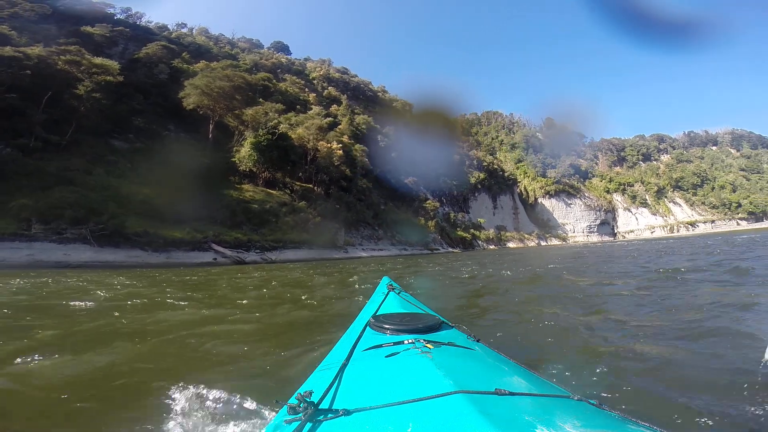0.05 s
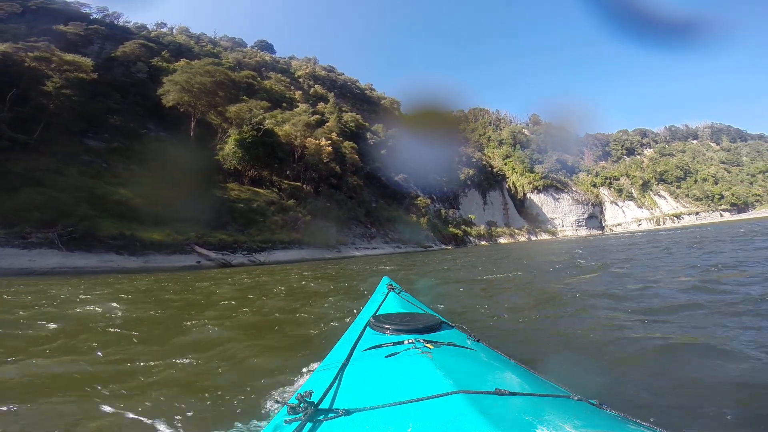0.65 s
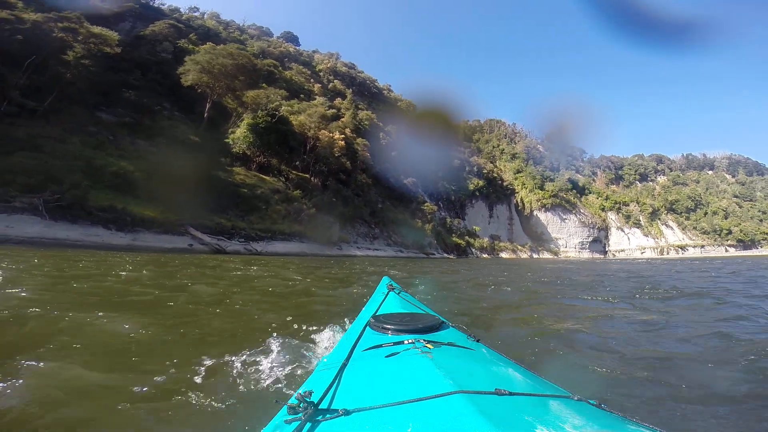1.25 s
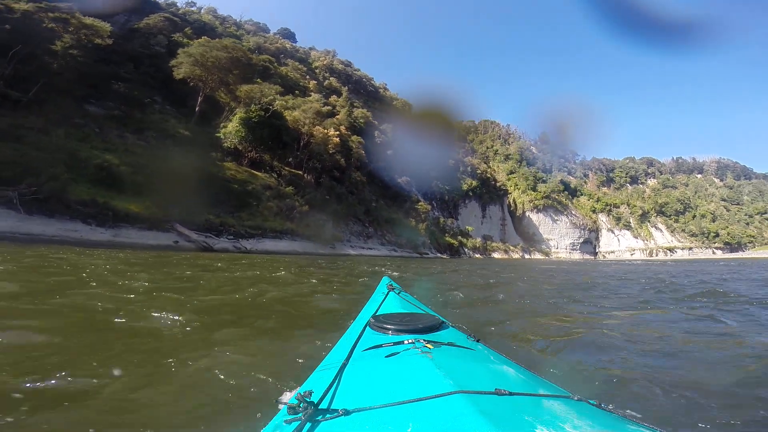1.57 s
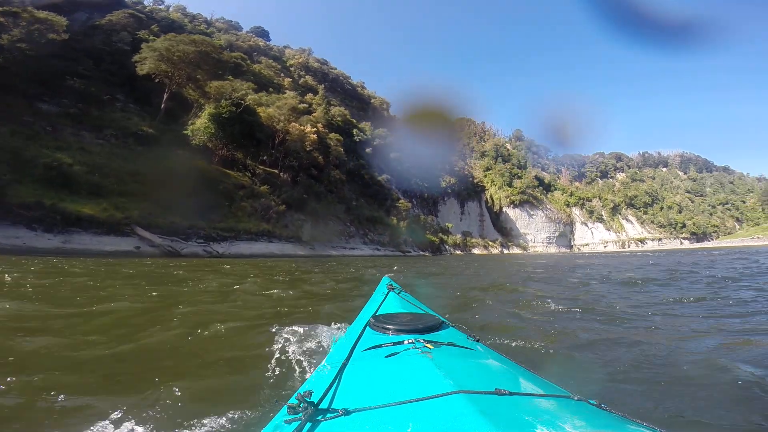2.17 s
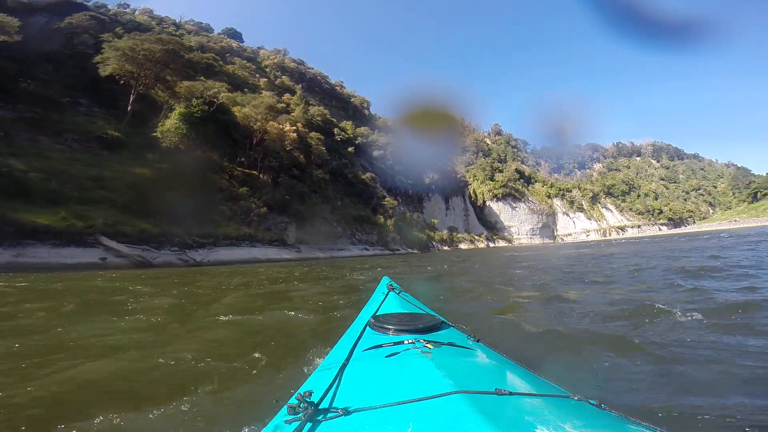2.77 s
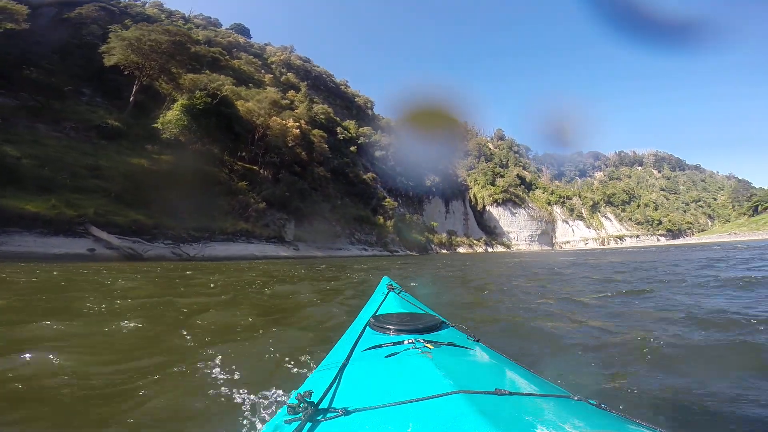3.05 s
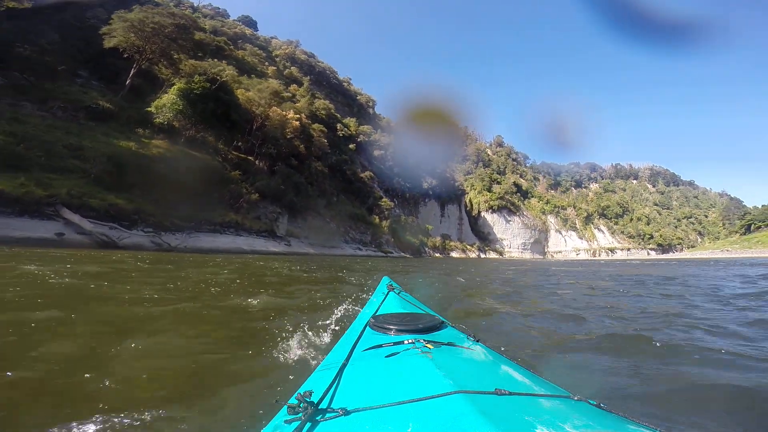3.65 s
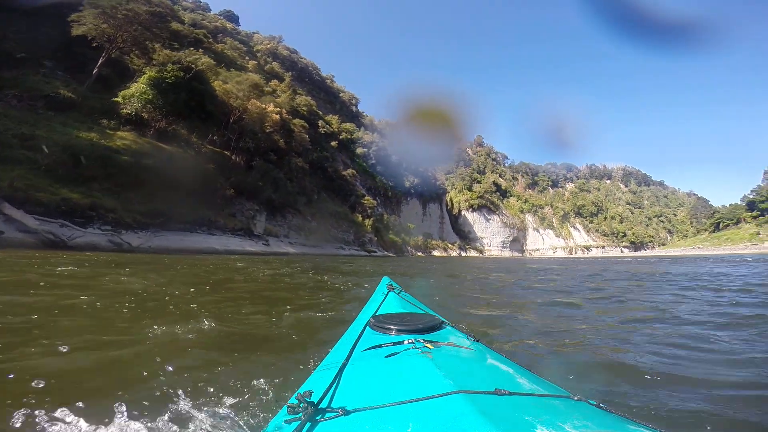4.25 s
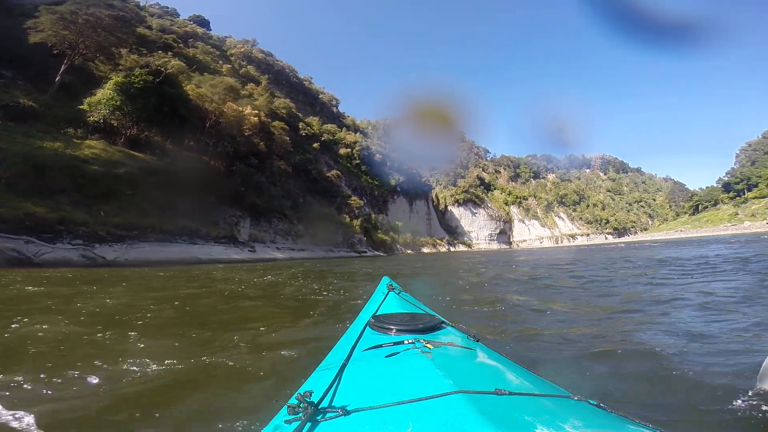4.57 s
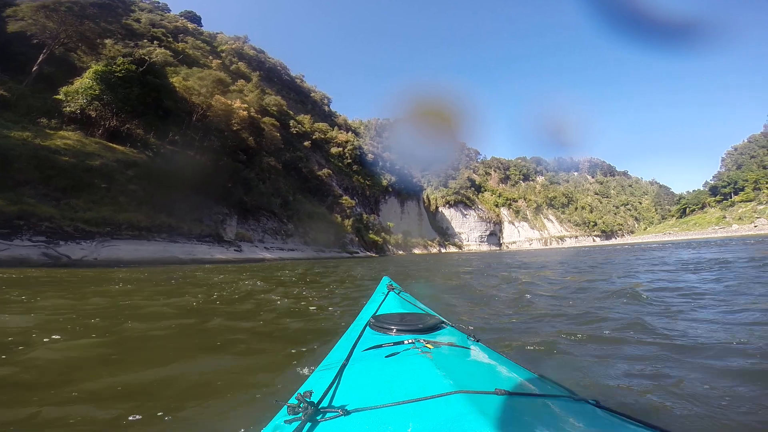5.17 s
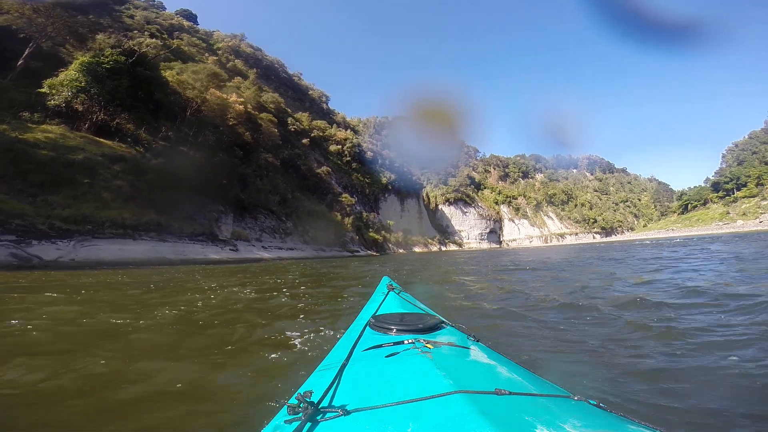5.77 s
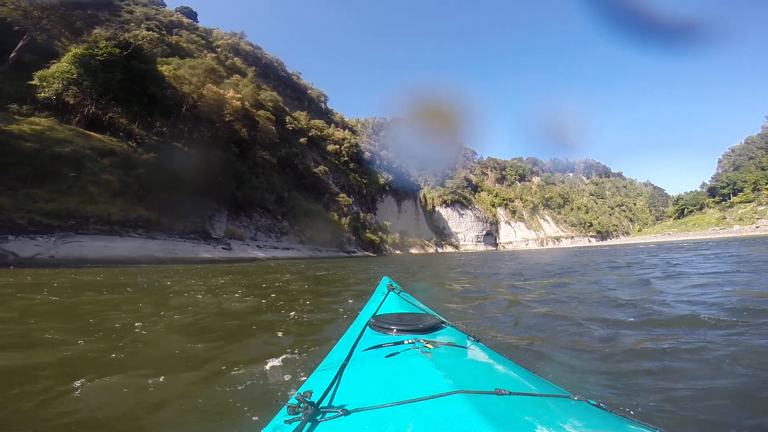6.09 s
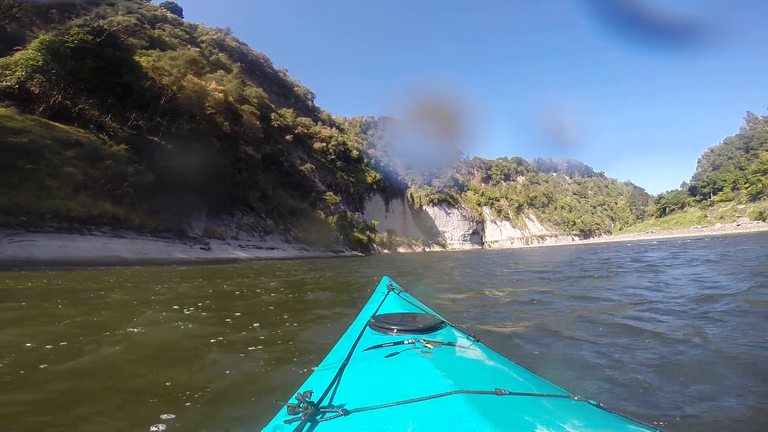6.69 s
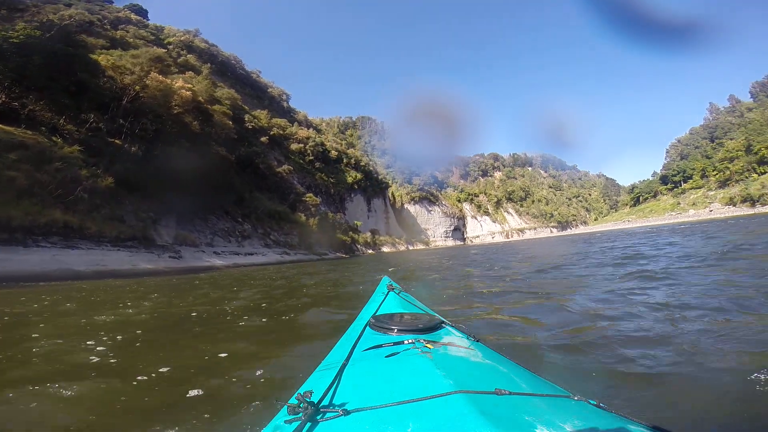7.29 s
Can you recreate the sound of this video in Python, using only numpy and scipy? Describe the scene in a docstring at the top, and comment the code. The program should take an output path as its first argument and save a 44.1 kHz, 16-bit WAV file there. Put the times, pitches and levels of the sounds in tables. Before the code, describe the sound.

A plastic kayak moves through choppy river water, heard up close from a microphone on its deck. Small waves gurgle and slap at the bow in quick, uneven bursts, with wet plops, fine spray and a few drops ticking on the deck. Trapped air gulps and makes the hollow hull thump. The water eases briefly, comes back stronger, then calms near the end, over a soft rumble and hiss.

```python
"""A plastic kayak moves through choppy river water, heard from a camera on its deck.
From the start, waves gurgle through the shell, shake the hull and spray, over a soft rumble and hiss.
Bubbles soon plop and drops tick on the deck. Then air trapped under the bow gulps, and the hull booms.
After a lull at about two seconds the waves pick up again; from about six seconds the water is calmer."""
import sys
import numpy as np
from scipy import signal
from scipy.fft import rfft, irfft, next_fast_len
from scipy.io import wavfile
from scipy.ndimage import map_coordinates

SR = 44100
rng = np.random.default_rng(int(sys.argv[2]) if len(sys.argv) > 2 else 0)


def generate_wav(sig):
    """Save sig (samples, or channels by samples) to the path in sys.argv[1] as 16-bit PCM at SR."""
    pcm = np.round(np.clip(np.atleast_2d(sig).T, -1, 1) * 32767).astype(np.int16)
    wavfile.write(sys.argv[1], SR, pcm)


N = 332073


def amp(db):
    """Turn decibels into a number to multiply by."""
    return 10 ** (np.asarray(db) / 20)


def unit(x):
    """Scale a sound to an average (rms) level of 1."""
    return x / np.sqrt(np.mean(x ** 2) + 1e-20)


def tone_gain(tone, hz):
    """How strongly a tone table of (Hz, dB) rows lets each frequency through."""
    points_hz, db = np.transpose(tone)
    return amp(np.interp(np.log(hz + 1), np.log(points_hz), db))


def curve(rows):
    """Join (seconds, value) points with straight lines."""
    return np.interp(np.arange(N) / SR, *np.transpose(rows))


def wobble(per_s):
    """A smooth curve through per_s random values a second."""
    return map_coordinates(rng.standard_normal(int(N * per_s / SR) + 4), [np.arange(N) * per_s / SR])


def filtered(x, response):
    """Turn each frequency up or down by response(hz)."""
    size = next_fast_len(len(x) + 8192)
    return irfft(rfft(x, size) * response(np.fft.rfftfreq(size, 1 / SR)), size)[:len(x)]


def through(x, tone, size=4096):
    """Pass a sound through a body that rings only after it is struck."""
    cepstrum = irfft(np.log(tone_gain(tone, np.fft.rfftfreq(size, 1 / SR))))
    cepstrum[1:size // 2] *= 2  # move all ringing to after the strike
    cepstrum[size // 2 + 1:] = 0
    ring = irfft(np.exp(rfft(cepstrum)))
    return signal.fftconvolve(x, ring)[:len(x)]


def noise(tone):
    """Steady noise with the given tone."""
    return unit(filtered(rng.standard_normal(N), lambda hz: tone_gain(tone, hz)))


def add(track, start_s, sound):
    """Mix a sound into the track."""
    part = track[max(0, round(start_s * SR)):][:len(sound)]
    part += sound[:len(part)]


def swell(t, life_s, rise):
    """Rise quickly to 1, then die away; rise is a share of the life."""
    shape = (1 - np.exp(-t / (rise * life_s))) * np.exp(-t / life_s)
    return shape / shape.max()


def surges(rows, rise_s, fall_s):
    """A level that builds, holds and fades for each (start, hold, dB) row."""
    t, power = np.arange(N) / SR, np.zeros(N)
    for start, hold, db in rows:
        near = slice(max(0, int((start - 10 * rise_s) * SR)), int((start + hold + 10 * fall_s) * SR))
        fade = np.maximum(start - t[near], 0) / rise_s + np.maximum(t[near] - start - hold, 0) / fall_s
        power[near] += (amp(db) * np.exp(-fade)) ** 2
    return np.sqrt(power)


def bubble(t, hz, life_s, glide):
    """Air rings in water; a positive glide lifts the pitch, as when a bubble nears the surface."""
    pitch = hz * (1 + glide * (np.tanh(t / (2 * life_s)) - .5))
    return np.sin(2 * np.pi * np.cumsum(pitch) / SR)


def burst(t, hz, life_s, splashy, rise, glide, octaves, tone):
    """One ringing bubble mixed with splashing noise around its pitch."""
    shape = swell(t, life_s, rise)
    band = lambda f: tone_gain(tone, f) * np.exp(-.5 * (np.log2((f + 1) / hz) / octaves) ** 2)
    splash = shape * filtered(rng.standard_normal(len(t)), band)
    ring = shape * bubble(t, hz, life_s, glide)
    return unit(np.sqrt(1 - splashy) * unit(ring) + np.sqrt(splashy) * unit(splash)) * np.std(ring)


def swarm(tone, per_s, centre_hz, octaves, cycles, spread_db, size):
    """A steady crowd of tiny bubbles or drops of random pitch and strength, heard through a body."""
    draws = rng.random((int(per_s * N / SR), 4))
    start = (draws[:, :1] * N).astype(int)
    hz = centre_hz * 2 ** (octaves * (draws[:, 1:2] + draws[:, 2:3] - 1))
    strength = amp(spread_db * np.minimum(-np.log(1 - draws[:, 3:]), 4))
    turns = hz * np.arange(size) / SR
    climb = 1 + .012 * turns / cycles
    rings = strength * np.exp(-turns / cycles) * np.sin(2 * np.pi * turns * climb)
    crowd = np.bincount((start + np.arange(size)).ravel(), rings.ravel(), N)[:N]
    return unit(through(crowd, tone))


# The tones of the rumble, river and hiss. Each row: frequency in Hz, boost or cut in dB.
RUMBLE_TONE = [(10, -22), (25, 3), (31, -2), (42, 2.5), (60, -2.5), (90, -3.5), (200, -55)]
RIVER_TONE = [(40, -18), (65, -32), (130, 4), (240, -13), (750, -18.5), (1300, -17), (1600, -41),
              (2240, -16), (4000, -34), (6000, -61)]
HISS_TONE = [(3200, -23.5), (4400, -16), (5100, -7.5), (5700, 1), (6150, 2), (6750, -7.5), (7350, -4.5),
             (8100, -10.5), (10100, -16), (11800, -32), (12900, -27.5), (15100, -40)]
# How the rumble comes and goes. Each row: time in seconds, level in dB.
RUMBLE_LEVELS = [(0, -67), (.45, -48.5), (.8, -41), (.98, -52), (1.18, -40), (1.35, -49), (1.6, -51),
                 (2.0, -57), (2.22, -45.5), (2.75, -52.5), (3.43, -45), (3.68, -60), (3.92, -44),
                 (4.1, -54), (4.62, -54), (4.88, -47), (5.55, -51), (5.85, -62), (7.5, -56)]
def background():
    """A low rumble, the open river, and the camera's hiss with its faint whine."""
    whine = np.sin(2 * np.pi * np.cumsum(12455 + 10 * wobble(30)) / SR)
    rumble = amp(curve(RUMBLE_LEVELS)) * noise(RUMBLE_TONE)
    return rumble + amp(-55.5) * noise(RIVER_TONE) + amp(-49.5) * noise(HISS_TONE) + amp(-85) * whine


# Lapping between the waves. Each row: time in seconds, level in dB.
LAPPING = [(0, -52.5), (1.5, -54.5), (2.3, -56), (3.5, -53), (5.3, -57.5), (6, -58.5), (7.5, -60)]
# Waves at the bow. Each row: arrival and hold in seconds, then gurgle, push and spray levels in dB.
BOW_WAVES = [(.02, 0.17, -55.5, -48, -56.5), (0.197, 0.098, -42, -35, -44.5),
             (0.392, 0.017, -41.5, -34.5, -66), (0.626, 0.13, -46.5, -47, -49),
             (0.866, 0.17, -41, -38, -48.5), (1.096, 0.045, -39.5, -30, -46),
             (1.237, 0.11, -50.5, -50, -47.5), (1.374, 0.13, -43.5, -38.5, -45),
             (1.543, 0.05, -38.5, -32, -50.5), (1.682, .02, -41.5, -38.5, -65),
             (1.805, 0.13, -48, -42, -50.5), (2.058, .22, -56.5, -52, -58), (2.472, .14, -43.5, -38, -46.5),
             (2.68, 0.054, -58, -64, -53), (2.856, 0.066, -49.5, -42.5, -54),
             (2.94, 0.079, -40.5, -33.5, -52), (3.072, 0.041, -43.5, -30, -57),
             (3.28, 0.034, -42, -48, -49.5), (3.337, 0.047, -35.5, -36, -53),
             (3.471, 0.014, -45.5, -39.5, -54), (3.687, 0.1, -49.5, -40, -48), (3.833, 0.12, -37, -31, -60),
             (4.153, 0.19, -41, -39, -47), (4.498, 0.086, -38.5, -38, -52),
             (4.699, 0.094, -36.5, -30.5, -51), (4.949, 0.037, -33.5, -29.5, -44.5),
             (5.056, 0.11, -49.5, -44.5, -52.5), (5.293, 0.095, -42, -40, -52),
             (5.534, .03, -41, -32.5, -59), (5.622, 0.16, -53.5, -46.5, -71),
             (6.075, 0.029, -52, -44.5, -70), (6.372, 0.025, -58.5, -44, -73),
             (6.562, 0.18, -56, -50.5, -68), (6.802, .03, -50, -43, -71), (6.974, 0.076, -48.5, -46, -69),
             (7.122, 0.066, -56.5, -47.5, -67), (7.53, .04, -61, -53, -52)]
def wave_levels():
    """How hard the water gurgles, pushes the hull and sprays: each wave rides on the lapping."""
    start, hold, gurgle_db, push_db, spray_db = np.transpose(BOW_WAVES)
    lapping = amp(curve(LAPPING) + 2.9 * wobble(21))
    gurgle = surges(zip(start, hold, gurgle_db), rise_s=.031, fall_s=.042)
    push = surges(zip(start, hold, push_db), rise_s=.015, fall_s=.049)
    spray = surges(zip(start, hold, spray_db), rise_s=.066, fall_s=.029)
    return np.hypot(gurgle, lapping), np.hypot(push, amp(3.5) * lapping), np.hypot(spray, amp(-4.5) * lapping)


# The hull's own notes. Each row: pitch in Hz, width in Hz, strength in dB.
HULL_NOTES = [(86.6, 26.3, 0.5), (130.8, 27.3, -0.5), (168.2, 13, -4), (227.3, 28.4, -9.5),
              (293.1, 15.4, -7), (421, 50, -13)]
def hull(push):
    """The hollow hull answers a push by ringing at its low notes."""
    def response(f):
        return sum((-1) ** k * amp(db) * 1j * f * width / (hz * hz - f * f + 1j * f * width)
                   for k, (hz, width, db) in enumerate(HULL_NOTES))
    return filtered(push, response)


# The tones of the plastic shell and the spray. Each row: frequency in Hz, boost or cut in dB.
SHELL_TONE = [(200, -10), (450, 1.5), (740, -4), (960, -3), (1110, -5), (1320, 3), (1480, -7), (1670, 3.5),
              (1900, -4), (2220, 2.5), (2650, -4.5), (3000, -6.5), (4200, -9.5), (9000, -28)]
SPRAY_TONE = [(1200, -5.5), (2800, 4.5), (4000, 0.5), (5200, 1), (7000, -0.5), (10000, -14), (15000, -27)]
def wash(gurgle_level, push_level, spray_level):
    """Running water gurgles through the shell, shakes the hull and throws fine spray."""
    flutter = wobble(60)
    froth = swarm(SHELL_TONE, per_s=1500, centre_hz=1413, octaves=1.98, cycles=2.6, spread_db=1.5, size=512)
    blips = swarm(SHELL_TONE, per_s=230, centre_hz=1785, octaves=1.512, cycles=7.5, spread_db=4, size=1024)
    gurgle = unit(froth + amp(1) * blips)
    shake = unit(hull(rng.standard_normal(N)))
    spray = swarm(SPRAY_TONE, per_s=1800, centre_hz=4296, octaves=1.505, cycles=5.6, spread_db=3, size=128)
    return (gurgle_level * amp(3.1 * flutter) * gurgle
            + push_level * amp(.87 * flutter) * shake
            + spray_level * amp(1.7 * flutter) * spray)


def stray_plops(gurgle_level, per_s=8, centre_hz=2530, octaves=.554):
    """Rows for small plops at random moments, louder when the water gurgles harder."""
    rows = []
    for when, soft, pitch, splashy in rng.random((int(per_s * N / SR), 4)):
        db = 20 * np.log10(gurgle_level[int(when * N)]) + 7.5 - 2 * soft
        hz = centre_hz * 2 ** (octaves * (2 * pitch - 1))
        rows.append((when * N / SR, db, hz, splashy / 2))
    return rows


# The clearest bubbles and slaps.
# Each row: start in seconds, level in dB, pitch in Hz, splashiness from 0 to 1.
CLEAR_PLOPS = [(.189, -26.5, 1350, 0.45), (.228, -25, 1655, .1), (.309, -28.5, 1210, .1),
               (.387, -25, 1650, .5), (.423, -30, 2150, .03), (.44, -27, 2320, 0.3),
               (.589, -26.5, 1870, 0.5), (.7, -19.5, 2226, .03), (.722, -25.5, 1170, 0.8),
               (.888, -25, 1920, 0.37), (1.017, -27.5, 2180, 0.4), (1.113, -17.5, 1310, 0.45),
               (1.122, -25.5, 1040, 0.6), (1.238, -32.5, 1650, 0.1), (1.29, -28, 4000, 0.3),
               (1.405, -21.5, 1724, 0), (1.603, -25.5, 930, .1), (1.688, -25, 1720, 0),
               (1.795, -34.5, 2650, 0), (1.861, -25.5, 1760, 0), (1.901, -33, 2880, 0),
               (2.057, -32, 1350, .4), (2.195, -38, 1380, .1), (2.588, -15, 1197, 0.36),
               (2.689, -27, 2730, 0.8), (2.739, -31.5, 2830, .4), (2.941, -22.5, 1680, 0.2),
               (2.973, -26, 1650, 0.6), (2.992, -20, 1700, 0.9), (3.078, -24.5, 1320, 0.65),
               (3.256, -25.5, 2190, 0.3), (3.259, -21.5, 980, 0.4), (3.381, -23, 1270, 0),
               (3.466, -29.5, 1066, 0), (3.486, -24.5, 1217, 0.08), (3.561, -30, 2550, 0.2),
               (3.618, -28, 1275, 0.16), (3.683, -28.5, 976, .5), (3.702, -27.5, 697, 0),
               (3.766, -19, 1320, 0.05), (3.836, -22, 1290, .9), (3.869, -27, 1460, 0.2),
               (3.919, -24, 1644, 0), (3.935, -18, 1594, .6), (3.936, -25.5, 4800, 0.07),
               (4.135, -19.5, 1218, 0.15), (4.259, -24, 1710, 1), (4.314, -26, 1605, 0.15),
               (4.357, -32.5, 2490, 0.36), (4.425, -31.5, 4300, 0.35), (4.493, -25.5, 1260, 0.3),
               (4.559, -21.5, 694, 0.98), (4.645, -28.5, 2300, 0.6), (4.664, -21.5, 1680, 1),
               (4.702, -17.5, 928, 0), (4.737, -24, 1250, 1), (4.774, -24.5, 1350, .2),
               (4.807, -24, 1680, 0.05), (4.955, -21.5, 1760, .9), (4.972, -26, 1385, .05),
               (5.009, -27.5, 2020, 0), (5.043, -27.5, 935, 1), (5.117, -26.5, 854, 0.05),
               (5.298, -17, 1627, 0.14), (5.373, -33, 1350, 0), (5.518, -33, 866, 0.8),
               (5.555, -25, 990, 0.6), (5.728, -19, 2116, 0.14), (5.9, -38.5, 1750, 0.6),
               (6.089, -37, 1690, .7), (6.542, -30.5, 1630, 1), (6.631, -37.5, 2120, 0.2),
               (7.046, -30, 1710, 0), (7.423, -40, 2320, .15)]
def plops(strays):
    """Short wet pops: the water rustles, a bubble rings, and the shell rattles briefly."""
    pops, rattles, rustles = np.zeros((3, N))
    t = np.arange(SR // 12) / SR
    for start, db, hz, splashy in CLEAR_PLOPS + strays:
        # Bigger, lower bubbles ring longer, and so do cleaner ones.
        life_s = .0035 * (1600 / hz) ** .48 * (1 - .14 * (splashy - .5))
        pop = burst(t, hz, life_s, splashy, rise=.58, glide=.096, octaves=.93, tone=SHELL_TONE)
        rattle = burst(t, hz, life_s=.0064, splashy=.99, rise=.31, glide=0, octaves=.16, tone=SHELL_TONE)
        rustle = burst(t, hz, life_s=.0022, splashy=.55, rise=.26, glide=0, octaves=.51, tone=SHELL_TONE)
        add(pops, start - .0005, amp(db) * pop)
        add(rattles, start + .001974, amp(db) * rattle)
        add(rustles, start + .00188 - t[-1], amp(db) * rustle[::-1])  # backwards, to build into the pop
    return amp(-1.5) * pops + amp(-11.5) * rattles + amp(-12) * rustles


# The tone of the deck. Each row: frequency in Hz, boost or cut in dB.
DECK_TONE = [(2000, -9), (5000, 8), (8000, -2), (10500, -2.5), (14500, -12)]
# Showers thrown by two waves. Each row: start in seconds, hold in seconds, level in dB.
SHOWERS = [(.21, .06, -75), (1.32, 0.087, -53.5)]
# Single big drops. Each row: start in seconds, level in dB, pitch in Hz.
BIG_DROPS = [(.6524, -39, 10500), (1.598, -42, 11000), (1.7935, -47, 11500), (1.833, -47, 12500),
             (1.93, -43, 12500), (3.3444, -38, 9500), (4.52, -22, 7800), (6.272, -38, 11800)]
def drips(spray_level):
    """Water lands on the deck: small drops patter with the spray and showers, big ones tick."""
    patter = swarm(DECK_TONE, per_s=250, centre_hz=9600, octaves=.66, cycles=.75, spread_db=2.5, size=128)
    patter_level = amp(-14.5) * spray_level + surges(SHOWERS, rise_s=.025, fall_s=.035)
    ticks, t = np.zeros(N), np.arange(SR // 50) / SR
    for start, db, hz in BIG_DROPS:
        tick = burst(t, hz, life_s=.0016, splashy=.86, rise=.36, glide=0, octaves=.26, tone=DECK_TONE)
        add(ticks, start, amp(db - 8) * tick)
    return ticks + patter_level * patter


# The tone of a gulp's splash. Each row: frequency in Hz, boost or cut in dB.
POCKET_TONE = [(80, 3), (250, 0.5), (420, 2), (560, -3), (800, -7.5), (1200, -11)]
# Air caught under the bow.
# Each row: start in seconds, level in dB, pitch in Hz, boom level in dB, splashiness from 0 to 1.
AIR_POCKETS = [(.724, -21.5, 224, -16, 0.5), (0.754, -26, 183, -20, 0.06), (1.039, -24, 471, -23.5, 0.5),
               (1.118, -19.5, 271, -28, 0.9), (1.5471, -9.5, 264.5, -36, 0.09),
               (1.571, -18.5, 188, -34, 0.1), (2.456, -29.5, 222, -31, 0.74), (2.59, -25.5, 336, -33, 1),
               (2.615, -33.5, 310, -27, 0.3), (2.941, -21.5, 308, -28, 0.8),
               (2.967, -30.5, 395, -24.5, 0.4), (3.0, -30, 282, -22.5, .3), (3.081, -16.5, 282, -24, 0.12),
               (3.097, -17.5, 250, -33, 0.06), (3.26, -26.5, 220, -36, 0.7), (3.306, -28.5, 193, -22, 0.65),
               (3.409, -28, 270, -16, 0.4), (3.705, -23, 490, -28, 0.64), (3.765, -29, 400, -30, .55),
               (3.833, -15, 455, -23, 0.1), (3.848, -17.5, 199, -23, .6), (3.866, -18, 375, -28, 1),
               (4.134, -32, 398, -34, .7), (4.56, -22.5, 409, -25.5, .57), (4.72, -25, 283, -18.5, 1),
               (4.753, -38, 191, -18.5, 0.1), (4.781, -29, 300, -22, 0.8), (4.826, -37, 374, -18.5, .5),
               (5.113, -29.5, 410, -30, 0.5), (5.296, -26.5, 333, -36, 0.6),
               (5.549, -22.5, 191, -19.5, 0.94), (5.624, -34, 269, -34, 0.94),
               (5.902, -35.5, 323, -29.5, 0.77), (6.069, -42.5, 280, -31, 0.4),
               (6.546, -35.5, 257, -43, 0.4), (6.997, -40.5, 344, -39, 0.7), (7.218, -34, 389, -45, 0.42)]
def gulps():
    """A wave closes on a pocket of air; the pocket throbs and the hull booms after it."""
    out, t = np.zeros(N), np.arange(SR // 6) / SR
    for start, db, hz, boom_db, splashy in AIR_POCKETS:
        throb = burst(t, hz, life_s=.01, splashy=splashy, rise=.19, glide=-.062, octaves=1, tone=POCKET_TONE)
        boom_hz = 130 * 2 ** rng.normal(0, .14)
        boom = swell(t, life_s=.026, rise=.2) * bubble(t, boom_hz, life_s=.0035, glide=-.061)
        add(out, start - .0005, amp(db) * throb + amp(boom_db - 2.5) * boom)
    return out


def scene():
    """Everything reaches one microphone on the deck; each gulp also rings the hull."""
    gurgle_level, push_level, spray_level = wave_levels()
    gulping = gulps()
    running = wash(gurgle_level, push_level, spray_level) + drips(spray_level) + background()
    plopping = plops(stray_plops(gurgle_level))
    return (running + plopping + gulping + amp(-4.5) * hull(gulping))[None]


def record(dry, top_hz=15280):
    """The camera cuts off the very highest treble."""
    return np.array([filtered(channel, lambda hz: hz < top_hz) for channel in dry])


dry = scene()
out = record(dry)
generate_wav(out)
```